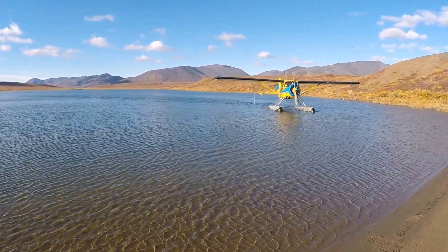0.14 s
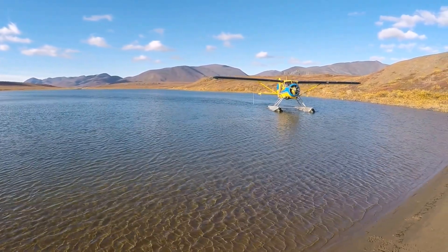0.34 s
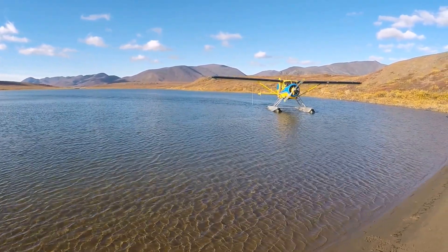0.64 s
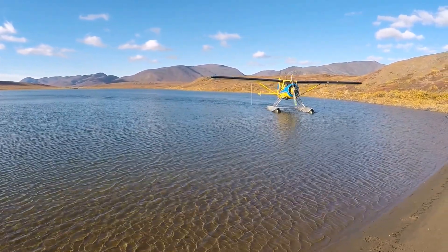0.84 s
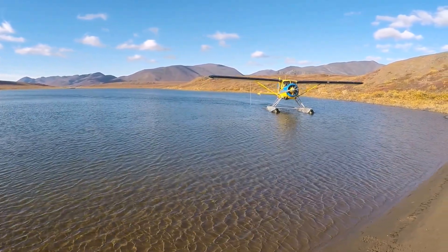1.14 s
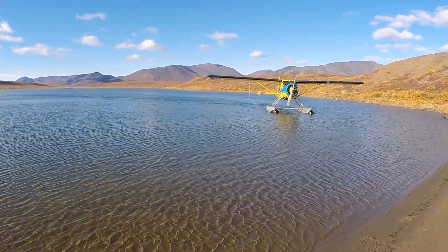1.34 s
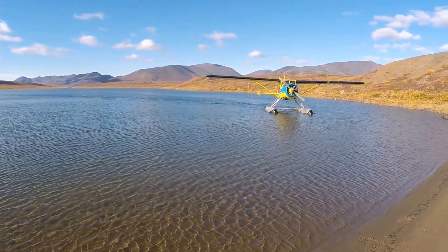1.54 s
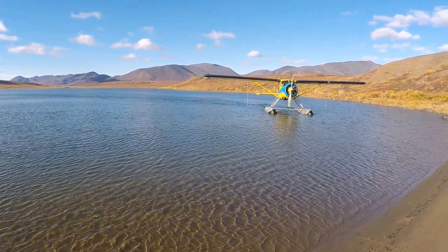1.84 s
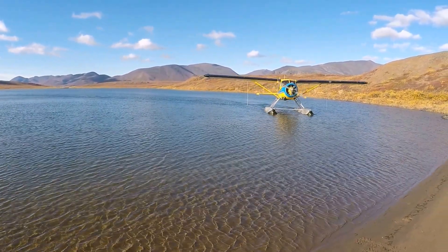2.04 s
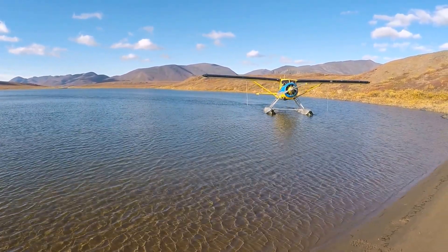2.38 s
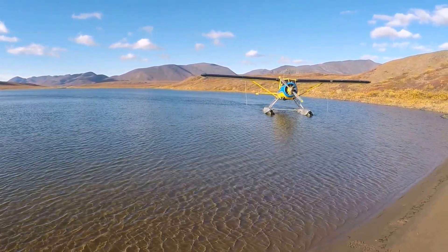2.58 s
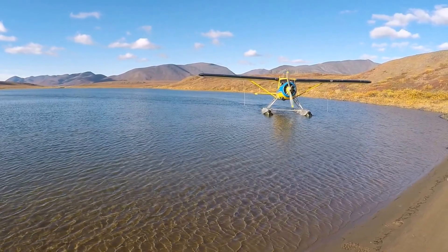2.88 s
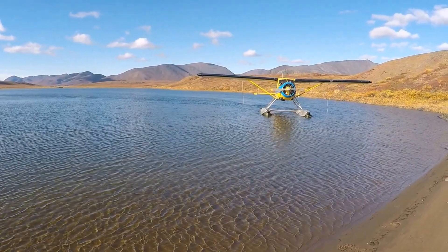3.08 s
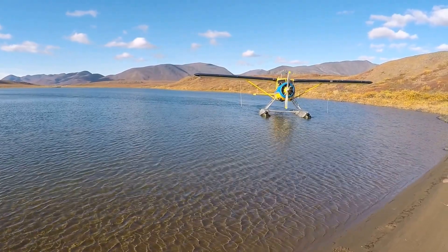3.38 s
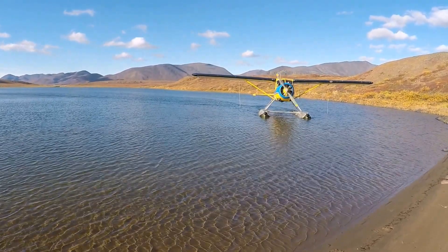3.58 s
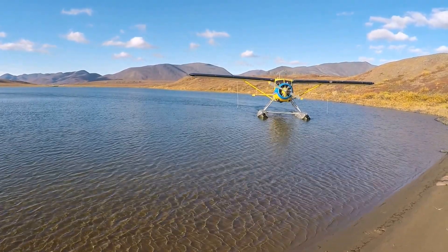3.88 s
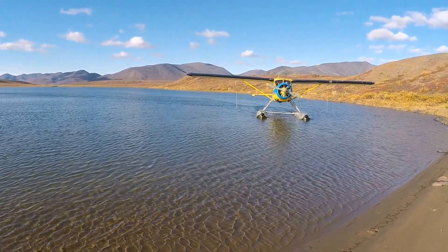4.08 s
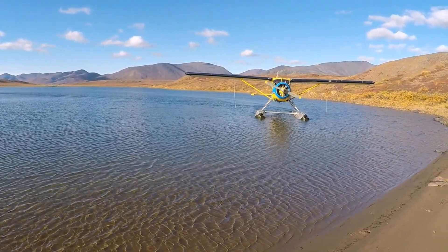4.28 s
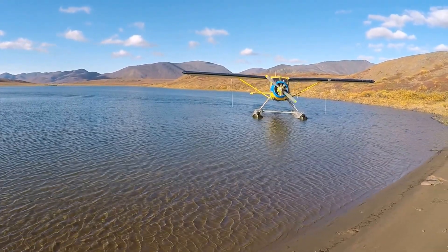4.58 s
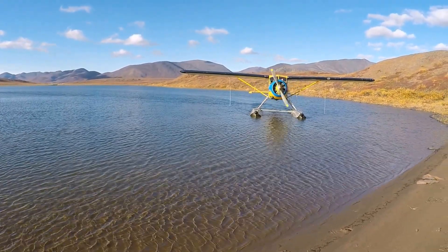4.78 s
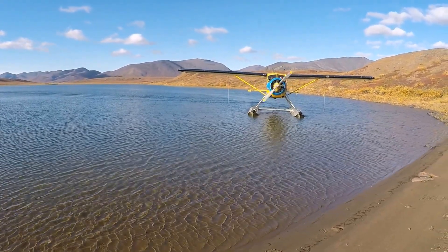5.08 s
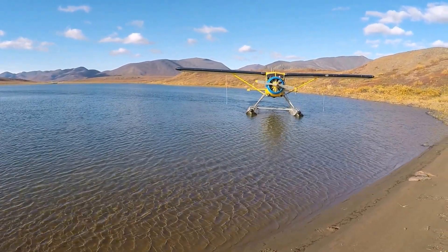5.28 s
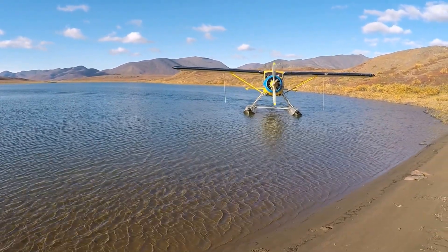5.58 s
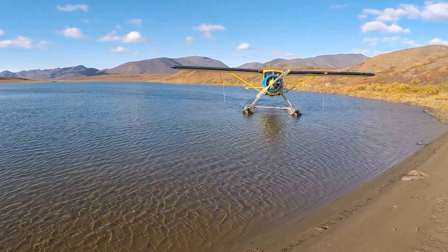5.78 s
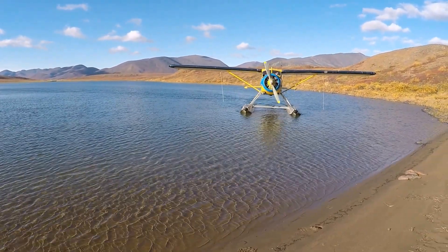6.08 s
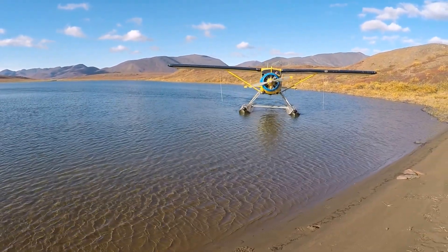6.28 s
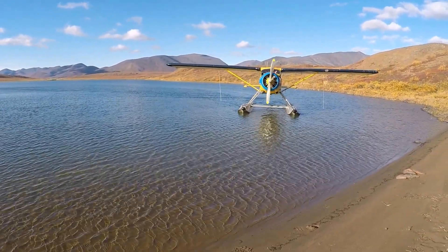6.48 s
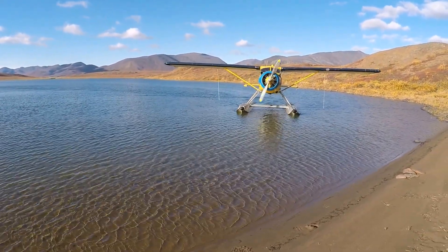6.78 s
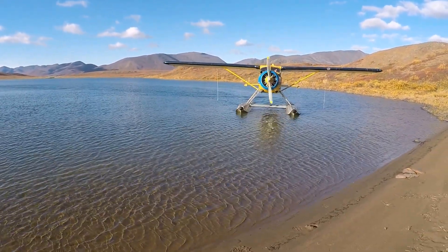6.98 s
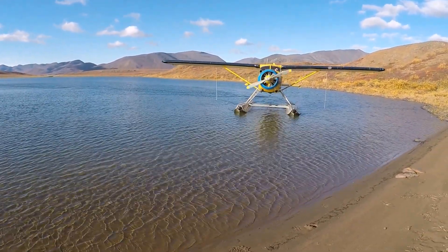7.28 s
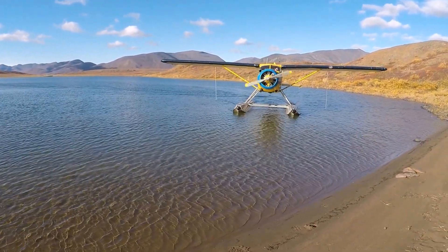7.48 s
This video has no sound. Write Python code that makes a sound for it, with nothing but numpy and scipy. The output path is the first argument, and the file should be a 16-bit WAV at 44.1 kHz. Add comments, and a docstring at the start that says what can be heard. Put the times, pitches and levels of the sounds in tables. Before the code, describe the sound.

An exposed microphone on a lake beach picks up strong wind and a radial-engined floatplane idling on the water. Throughout, the wind is louder and deeper than the engine: a wavering hum near 58 Hz, lumpy rumble and short gliding thumps with ragged flaps. From 0 to 2.9 s the engine sputters in fast, uneven exhaust puffs, hissing and whistling around 2 kHz over a mid-pitched drone, propeller rush and fine valve crackle. Between 2.9 and 3.6 s the whistle fades to a dull breath and lone clicks stand out. From 4 to 5 s the puffs are softer, barkier and shorter, with the roar sinking. Wind slaps bunch densely at 4.2 to 4.5 s and hit hardest around 5.3 to 5.8 s. After 6.3 s the wind mostly eases, leaving distinct dry chugs and faint clicks, with a few small thumps near 7.4 s; the engine is still idling at the end.

```python
"""A radial-engined floatplane idles unevenly on a lake, turning its nose toward a microphone on the beach.
At first exhaust puffs hiss and whistle in the pipes over a roar of drone, rush and hum.
From 2.9 to 3.6 s the nose hides the pipe mouths: the whistle blurs to a breath, then lone clicks stand out.
Late on the roar sinks and the puffs grow shorter. Filtered noise and wavering sines make these sounds.
Throughout, wind gives a wavering low hum near 58 Hz and slaps the microphone in short gliding swings."""
import sys
import numpy as np
from scipy import signal
from scipy.fft import rfft, irfft, next_fast_len
from scipy.io import wavfile
from scipy.ndimage import uniform_filter1d

SR = 44100
rng = np.random.default_rng(int(sys.argv[2]) if len(sys.argv) > 2 else 0)


def waveform_to_disk(signal):
    """Save audio, clipped to [-1, 1], as 16-bit WAV at the path in sys.argv[1]."""
    frames = np.transpose(np.atleast_2d(signal))
    scaled = np.clip(frames, -1, 1) * 32767
    samples = np.round(scaled).astype(np.int16)
    wavfile.write(sys.argv[1], SR, samples)


def gain_from_db(level_db):
    """Turn a decibel level (scalar or array-like) into a linear amplitude factor."""
    decades = np.asarray(level_db, float) / 20
    return 10 ** decades


N = 336924
T = np.arange(N) / SR  # seconds
F = np.maximum(np.fft.rfftfreq(next_fast_len(N, real=True), 1 / SR), 1)  # Hz
LONG = 2 * (len(F) - 1)  # noise is made a little longer, at a quick transform size

# Roar between the puffs. Each row: time in seconds, then nominal levels of drone, rush and hum in dB.
ROAR_LEVELS = [(0.0, -44.5, -44.5, -45.5), (1.38, -42, -44.5, -46), (1.81, -42, -42, -39.5),
               (2.06, -40.5, -44.5, -46.5), (2.47, -39.5, -41, -41.5), (2.79, -40, -43, -43.5),
               (5.02, -45, -47, -50), (5.6, -45, -45.5, -50), (6.43, -45.5, -50, -48),
               (7.25, -53.5, -54, -48), (7.64, -50, -54.5, -50.5)]
# Wind on the microphone. Each row: time in seconds, then nominal levels of heave and rumble in dB.
WIND_LEVELS = [(0.0, -15, -31.5), (0.08, -21, -28), (0.15, -15.5, -28), (0.59, -20, -40), (0.68, -15, -31),
               (0.94, -21, -29), (1.0, -8.5, -28.5), (1.06, -22, -30), (1.51, -19, -39), (1.55, -30, -32),
               (1.64, -19, -28.5), (1.91, -19, -32), (2.06, -20, -29), (2.62, -18.5, -32.5),
               (2.68, -20, -31), (4.02, -22, -37.5), (4.17, -20.5, -28.5), (4.34, -16.5, -26.5),
               (4.72, -22, -36.5), (5.64, -18, -29), (7.02, -28.5, -49), (7.32, -29, -47),
               (7.4, -18.5, -45), (7.64, -24.5, -42)]
# Spectrum of the propeller rush, also of valve ticks. Each row: frequency in Hz, relative gain in dB.
RUSH_COLOUR = [(1500, 2.5), (2100, 1), (2400, -0.5), (3100, -1.5), (3650, -6.5), (5000, -9.5),
               (7000, -18.5), (8500, -26.5), (13000, -34.5), (15300, -40)]


def unit(x):
    """Normalisation to unit rms, the root of the mean power."""
    return x / np.sqrt(np.mean(x ** 2))


def response(colour):
    """Spectral envelope: gain per frequency, interpolated in dB over log frequency."""
    hz, db = np.transpose(colour)
    return gain_from_db(np.interp(np.log(F), np.log(hz), db, left=-99, right=-99))


def shaped(gain):
    """Linear filtering: white noise takes on the gain at each frequency."""
    spectrum = rfft(rng.standard_normal(LONG))
    return unit(irfft(spectrum * gain, LONG))


def noise(colour, even=0.):
    """Narrow bands of noise swell by chance; dividing by the envelope evens them as even nears 1."""
    gain = response(colour)
    x = shaped(gain)
    if even:
        x = x / (np.abs(signal.hilbert(x)) + 0.15) ** min(even, 1)
        skirts = np.minimum(4 * gain / gain.max(), 1)  # keeps the skirts dark
        x = unit(irfft(rfft(x) * skirts, LONG))
    return x[:N]


def walk(rate):
    """Slow random modulation: levels held 1 / rate s and slewed twice; spread near 1."""
    hold = int(SR / rate)
    levels = np.repeat(rng.standard_normal(N // hold + 1), hold)
    return unit(uniform_filter1d(uniform_filter1d(levels, hold), hold)[:N])


def tone(hz):
    """Frequency modulation: phase is the running integral of the pitch."""
    return np.sin(2 * np.pi * np.cumsum(hz) / SR)


def patchy(colour, swing_db, rate, count=6):
    """Independent modulation of adjoining bands: the colour of the noise keeps shifting."""
    edges = np.geomspace(colour[0][0], colour[-1][0], count + 1)
    spectrum = rfft(shaped(response(colour)))
    total = 0
    for low, high in zip(edges, edges[1:]):
        band = irfft(spectrum * ((F >= low) & (F < high)), LONG)[:N]
        total = total + band * gain_from_db(swing_db * walk(rate))
    return unit(total)


def curves(table):
    """Piecewise-linear control: the columns of a table at every sample."""
    s, *columns = np.transpose(table)
    return [np.interp(T, s, c) for c in columns]


def bursts(times, db, rise, fall, late, knee=0.92):
    """Incoherent sum: event powers add; bell rise, peak late s after its time, fall more abrupt with knee."""
    power = np.zeros(N)
    for s, size, up, down in np.broadcast(times, gain_from_db(db), rise, fall):
        near = slice(max(int((s + late - 3 * up) * SR), 0), int((s + late + 6 * down) * SR))
        t = T[near] - s - late
        shape = np.where(t < 0, np.exp(-(t / up) ** 2), np.exp(-np.abs(t / down) ** knee))
        power[near] += (size * shape) ** 2
    return np.sqrt(power)


def eddies(times, db, hz, glide, rise, fall):
    """Passing vortices: each gives one short pressure swing whose pitch drops as the eddy passes."""
    out = np.zeros(N)
    for s, size, pitch, start in zip(times, gain_from_db(db), hz, rng.random(len(times))):
        near = slice(max(int((s - .04) * SR), 0), int((s + .06) * SR))
        t = T[near] - s
        cycles = pitch * (1 - np.exp(-glide * t)) / glide  # integral of a decaying pitch
        swing = np.cos(2 * np.pi * (cycles + 0.44 * (start - .5)))
        out[near] += size * np.exp(-(t / np.where(t < 0, rise, fall)) ** 2) * swing
    return out


def between(times, listed, clear_s):
    """Event spacing: which times lie clear of every listed event."""
    return np.abs(times[:, None] - listed).min(axis=1) > clear_s


def air():
    """Stationary broadband noise: a faint steady airy hiss."""
    # Each row: frequency in Hz, relative gain in dB.
    air_colour = [(3000, -23.5), (5000, -14), (9000, 0), (15300, -6)]
    return gain_from_db(-74.5) * noise(air_colour)


def buffets():
    """Turbulent intermittency: strong buffets, and small ones at chance moments that follow the rumble."""
    # Each row: nominal time in seconds, slap level in dB, rattle in dB against the slap, slap pitch in Hz.
    strong_buffets = [(0.058, -22, -5, 161), (0.135, -22.5, -14, 139), (0.193, -14.5, -13, 113),
                      (0.312, -19, -6, 153), (0.427, -27.5, 3, 182), (0.841, -15.5, -15, 126),
                      (1.056, -27, -6, 142), (1.32, -16.5, -19.5, 130), (1.431, -15, -13.5, 129),
                      (1.471, -14, 2, 175), (1.638, -17, -15.5, 150.2), (1.701, -21.5, -11, 205),
                      (1.794, -24.5, -10, 152.8), (1.931, -27.5, -8.5, 153), (1.968, -18.5, -7, 132),
                      (2.093, -39, -10, 144.8), (2.239, -21, -12, 130.0), (2.345, -15.5, -11, 163),
                      (2.539, -28, -27, 140.8), (2.587, -20, -1, 145), (2.619, -17.5, -11, 146),
                      (2.666, -19.5, -11, 117), (2.855, -24.5, -11, 124.7), (3.003, -29, -9, 198),
                      (3.039, -23, -15, 122.0), (3.726, -17.5, -21, 158), (3.749, -19.5, -20, 135.4),
                      (3.834, -19, -19, 146.0), (4.17, -19.5, -14, 124), (4.272, -14.5, -26, 127.0),
                      (4.314, -20.5, -16, 135.8), (4.352, -20, -9, 133), (4.394, -21.5, -11, 119),
                      (4.42, -18, -1.5, 196), (4.517, -18.5, -26, 122.2), (4.714, -20.5, -14, 155.3),
                      (4.944, -16, -23, 128), (4.976, -15, -16, 138), (5.041, -21, -26, 101),
                      (5.082, -22.5, -33, 146), (5.193, -19, -27, 130.1), (5.236, -20, -16, 120.9),
                      (5.331, -10, -8.5, 146), (5.491, -14, -20, 115.9), (5.53, -12, -2.5, 130.9),
                      (5.596, -18.5, -7, 198), (5.633, -17.5, -9, 142), (5.738, -18.5, -14, 145.3),
                      (5.796, -27.5, -16, 142.5), (5.828, -13.5, -4.5, 201.5), (5.983, -14.5, -27, 148.9),
                      (6.021, -12.5, -12, 138.1), (6.136, -17.5, -18, 132), (6.234, -27, -17, 107),
                      (6.289, -27, -17, 110.1), (6.429, -31, -14, 142), (6.691, -26, -32, 121.3),
                      (7.404, -25, -21, 111.4), (7.479, -19.5, -37, 130), (7.595, -26.5, -31, 138.5)]
    small_per_s, small_hz = 9, 122  # before those near a strong buffet are left out; typical pitch
    small_db, small_scatter_db, small_rattle_db = 2, 3.5, -14  # slap over the rumble; rattle at most
    strong = np.array(strong_buffets)
    count = int(small_per_s * N / SR)
    chance = rng.standard_normal((count, 3))
    s = (np.arange(count) + rng.random(count)) / small_per_s
    slap_db = np.interp(s, T, curves(WIND_LEVELS)[1]) + small_db + small_scatter_db * chance[:, 0]
    rattle_db = small_rattle_db - 4.7 * np.abs(chance[:, 1])
    small = np.column_stack([s, slap_db, rattle_db, small_hz * (1 + 0.17 * chance[:, 2])])
    return np.vstack([strong, small[between(s, strong[:, 0], .03)]]).T


def low_hum(s, slap_db):
    """Frequency and amplitude modulation: a low hum near 58 Hz wavers and swells with each buffet."""
    # Each row: time in seconds, pitch in Hz about which the hum wavers, nominal level in dB.
    hum_waver = [(0.0, 65.7, -15.5), (0.08, 64.8, -24), (0.17, 58.87, -12), (0.49, 58.05, -28),
                 (0.64, 62.5, -30), (0.72, 55.95, -24.5), (1.3, 62, -15.5), (1.4, 48.7, -19),
                 (1.47, 47.8, -15.5), (1.6, 62.3, -20), (1.81, 55.16, -10), (2.0, 56.14, -21),
                 (2.57, 60.08, -14.5), (3.15, 57.1, -17.5), (3.25, 60.48, -16), (3.43, 51.9, -21),
                 (3.62, 51.93, -22), (3.72, 59.8, -20), (3.96, 61.5, -23), (4.17, 55.56, -15.5),
                 (4.45, 53.7, -33), (4.51, 49.06, -26), (4.66, 50.22, -20), (4.79, 62.7, -19.5),
                 (4.94, 55.62, -20.5), (5.36, 56.65, -26), (5.45, 52, -13), (5.64, 61.26, -24),
                 (6.04, 53.3, -23.5), (6.13, 48.52, -20.5), (6.51, 51.5, -26.5), (6.59, 60.5, -34),
                 (7.23, 50.68, -34.5), (7.38, 63.77, -36), (7.55, 53.2, -35), (7.64, 54.4, -36)]
    hum_hz, hum_db = curves(hum_waver)
    sine = tone(hum_hz * (1 + 0.025 * walk(24.97)))
    swell = bursts(s, slap_db, 0.012, 0.0092, 0.0034, knee=2.3)
    return (gain_from_db(hum_db + 0.5 + 3.1 * walk(22)) + swell) * sine


def gusts():
    """Turbulent pressure: slow heave, lumpy rumble, flutter, and the port's cavity resonance."""
    # Four spectra. Each row: frequency in Hz, relative gain in dB.
    heave_colour = [(12, -5), (25, -2.5), (45, -2.5), (80, -8.5), (120, -46)]
    rumble_colour = [(60, 6), (90, 1), (140, -3.5), (200, -8), (280, -20.5), (500, -63)]
    boom_colour = [(90, -31), (120, -4), (140, 0), (165, -4.5), (220, -21)]
    flap_colour = [(170, -6.5), (230, 0.5), (330, -5), (450, -8.5), (600, -21)]
    # Cavity boom rung by the wind. Each row: time in seconds, level in dB against the nominal rumble.
    boom_levels = [(0, -2), (.6, -2), (2.9, -2), (3.5, -9.5), (7.64, -18)]
    # Fluttering wind between the buffets. Each row: time in seconds, nominal level in dB.
    flutter_levels = [(0.0, -40), (0.23, -45), (0.45, -47), (0.7, -48.5), (0.94, -42), (1.4, -47),
                      (1.81, -37.5), (1.98, -36), (2.21, -45), (2.49, -38), (3.17, -44.5), (3.81, -40),
                      (4.09, -49), (4.36, -48), (4.72, -46), (5.02, -54), (5.13, -55), (5.55, -36.5),
                      (5.68, -35), (5.79, -42), (6.08, -51), (6.3, -57), (6.89, -54), (7.64, -55)]
    heave_db, rumble_db = curves(WIND_LEVELS)
    heave = gain_from_db(heave_db - 2.0 + 1.9 * walk(8.2)) * noise(heave_colour)
    rumble = gain_from_db(rumble_db + 2.5 + 4.8 * walk(35)) * noise(rumble_colour, even=0.99)
    boom = gain_from_db(rumble_db + curves(boom_levels)[0] + 2.7 * walk(12)) * noise(boom_colour)
    flutter = gain_from_db(curves(flutter_levels)[0] - 1.9 + 4.16 * walk(45)) * noise(flap_colour)
    return heave + rumble + boom + flutter


def slaps(s, slap_db, rattle_db, slap_hz):
    """Eddy impact: a gliding thump with ragged noise; small eddies come first, so it starts bright."""
    # Two spectra. Each row: frequency in Hz, relative gain in dB.
    slap_colour = [(60, 0), (120, 1), (220, -1.5), (350, -11.5), (480, -24)]
    rattle_colour = [(250, -1.5), (420, -1), (700, -15.5), (1000, -19), (1500, -40)]
    torn = gain_from_db(2.5 * walk(120))  # a buffet comes in ragged flaps
    thumps = gain_from_db(3.5) * eddies(s, slap_db, slap_hz, glide=43.0, rise=0.0065, fall=0.019)
    body = gain_from_db(-5.0) * bursts(s, slap_db, 0.0092, 0.017, 0.00063, knee=0.96)
    body = body * noise(slap_colour, even=0.91) * torn
    rattle = gain_from_db(-4.5) * bursts(s, slap_db + rattle_db, 0.0059, 0.014, -0.0047, knee=1.4)
    rattle = rattle * noise(rattle_colour, even=0.36) * torn
    return thumps + body + rattle


def snaps():
    """Small-scale turbulence: sharp flaps, each a noise burst with a gliding pressure swing."""
    # Each row: nominal time in seconds, nominal level in dB, pitch in Hz at the centre of the swing.
    sharp_flaps = [(0.053, -27, 283), (0.138, -28, 231), (0.188, -20.5, 290), (0.236, -29, 744),
                   (0.3, -16, 231), (0.308, -19, 614), (0.316, -28, 520), (0.42, -18.5, 315),
                   (0.719, -27, 533), (0.73, -28.5, 520), (0.823, -20.5, 283), (0.882, -26, 520),
                   (0.896, -26, 480), (0.986, -23, 237), (1.045, -30, 520), (1.12, -29, 547),
                   (1.315, -24, 258), (1.413, -27, 563.4), (1.424, -29, 580), (1.46, -19, 300),
                   (1.468, -12, 260), (1.477, -17, 420), (1.631, -23, 231), (1.698, -17.5, 258),
                   (1.788, -19, 253), (1.894, -29, 264), (1.923, -14, 258), (1.965, -19.5, 240),
                   (1.996, -20, 300), (2.21, -30, 250), (2.337, -27, 231.2), (2.585, -16.5, 420),
                   (2.709, -16, 230), (2.785, -26, 230.8), (2.998, -16.5, 231.4), (3.106, -35, 243),
                   (3.7, -18.5, 262.7), (3.72, -21, 330), (3.741, -20, 280), (3.77, -23, 300),
                   (3.797, -26, 420), (3.82, -27, 560), (4.022, -26.5, 280), (4.165, -20, 231),
                   (4.191, -22, 300), (4.265, -26, 232), (4.311, -28, 252.2), (4.345, -24, 231),
                   (4.388, -21, 330), (4.412, -15.5, 232), (4.453, -22, 260), (4.522, -28, 231),
                   (4.642, -31, 405.5), (4.709, -24, 256.3), (4.939, -27, 228.4), (4.969, -18.5, 231.2),
                   (5.075, -32, 231), (5.18, -24.5, 249.9), (5.307, -22, 299.9), (5.319, -14.5, 266.2),
                   (5.33, -13, 300), (5.348, -28, 328.4), (5.37, -21, 260), (5.494, -22, 283),
                   (5.521, -12, 700), (5.526, -12.5, 400), (5.545, -22, 379.3), (5.561, -31, 330),
                   (5.597, -19, 261), (5.61, -19.5, 350), (5.634, -17.5, 234), (5.702, -27, 280),
                   (5.732, -25, 261.1), (5.809, -21, 540.6), (5.814, -12, 279), (5.838, -20, 560),
                   (5.983, -26, 231), (6.014, -19, 229.7), (6.127, -24.5, 315), (6.421, -28, 231.6),
                   (7.392, -27, 240.1), (7.477, -32, 231.4)]
    # Each row: frequency in Hz, relative gain in dB.
    snap_colour = [(200, -1), (400, 4.5), (700, -5), (1000, -13), (1500, -38)]
    at, snap_db, snap_hz = np.transpose(sharp_flaps)
    hiss = gain_from_db(-10.0) * bursts(at, snap_db, 0.0017, 0.0045, 0.0032) * noise(snap_colour, even=0.59)
    return hiss + gain_from_db(-3.0) * eddies(at + 0.00258, snap_db, snap_hz, glide=48.0, rise=0.0024, fall=0.005)


def wind():
    """Flow noise at a microphone: low hum, turbulent gusts and buffets superpose."""
    s, slap_db, rattle_db, slap_hz = buffets()
    return low_hum(s, slap_db) + gusts() + slaps(s, slap_db, rattle_db, slap_hz) + snaps()


def valve_gear(rush_db):
    """Impact noise: a dense crackle of ticks that follows the rush, and lone sharp clicks."""
    # Lone clicks. Each row: nominal time in seconds, nominal level in dB.
    lone_clicks = [(3.3364, -36), (3.527, -32), (3.6004, -38), (3.7833, -39), (3.8909, -40), (3.9827, -40),
                   (5.9544, -42.5), (6.1892, -44), (6.3719, -38), (6.4278, -43), (6.6872, -33.5),
                   (6.7745, -47), (7.0294, -48), (7.1544, -43), (7.5373, -46)]
    # Each row: frequency in Hz, relative gain in dB.
    click_colour = [(1800, -8), (3000, -1), (4500, 0), (7000, -8.5), (9000, -18)]
    crackle_per_s, crackle_db, crackle_scatter_db = 140, -4, 2.5  # levels against the nominal rush
    count = int(crackle_per_s * N / SR)
    at = (np.arange(count) + rng.random(count)) / crackle_per_s
    tick_db = np.interp(at, T, rush_db) + crackle_db + crackle_scatter_db * rng.standard_normal(count)
    crackle = bursts(at, tick_db, 0.0006, 0.0021, 0) * noise(RUSH_COLOUR)
    at, click_db = np.transpose(lone_clicks)
    return crackle + gain_from_db(-3.0) * bursts(at, click_db, 0.00063, 0.0016, 0.0012) * noise(click_colour)


def roar():
    """Amplitude-modulated noise: cowling drone and propeller rush share a flutter, over hum and valve gear."""
    # Two spectra. Each row: frequency in Hz, relative gain in dB.
    drone_colour = [(750, -27), (880, -7.5), (1100, 6), (1400, -3.5), (1800, -17), (2200, -17)]
    hum_colour = [(330, -18), (450, -9.5), (600, -3), (760, -8), (900, -14)]
    drone_db, rush_db, hum_db = curves(ROAR_LEVELS)
    flutter_db = 1.3 * walk(55)
    drone = gain_from_db(drone_db + flutter_db + 1.23 * walk(60)) * noise(drone_colour)
    hum = gain_from_db(hum_db - 4.0 + 2.7 * walk(30)) * noise(hum_colour)
    rush = gain_from_db(rush_db + flutter_db - 0.97) * patchy(RUSH_COLOUR, 3.25, 60)
    return valve_gear(rush_db) + drone + hum + rush


def firings():
    """Quasi-periodic excitation: listed puffs, and weak ones on a jittered beat wherever it is clear of them."""
    # Puffs, down to a faint dull breath near the end. Each row: nominal time in seconds,
    # nominal hiss level in dB, then sizzle, pipe whistle and bark, each in dB against the nominal hiss.
    listed_puffs = [(0.045, -34.5, -12.5, -26, -7), (0.123, -31, -16, -9.5, -3),
                    (0.193, -32, -14, -0.5, -20), (0.234, -31, -12, -5, -3), (0.421, -33.5, -13, -12, 1.5),
                    (0.511, -44, -26, -16, 1), (0.582, -38, -21, -6, -6), (0.648, -38, -10.5, 3, -1),
                    (0.726, -39.5, -11, -21, -12), (0.779, -41.5, -25, -4.0, 13),
                    (0.845, -31.5, -14, 1.5, -13), (0.888, -33, -10.5, -8, -19), (0.936, -39, -22, -11, 4),
                    (0.969, -32.5, -16, -4, -7.5), (1.002, -34.5, -12, -1, 3), (1.042, -32, -13.5, -4, -7),
                    (1.118, -32.5, -12, 4, -3), (1.207, -45, -25, -6, -6), (1.269, -31, -13.5, -6, -5),
                    (1.418, -36.5, -11, -14, -13), (1.466, -38.5, -22, -9, 8), (1.57, -35, -10, 2.5, -15),
                    (1.617, -40.5, -26, -2, 11), (1.649, -35.5, -16, -5, -1.0),
                    (1.683, -31.5, -13, -11, -4), (1.721, -36.5, -9.5, 6, -5), (1.797, -31, -14, -5, -3),
                    (1.83, -34, -17, -13, -6), (1.862, -36, -11, 0, 2.5), (1.94, -31.5, -14.5, -2.5, -12),
                    (2.084, -34.5, -12.5, -4, -8), (2.228, -36.5, -9.5, 2, -14), (2.276, -44.5, -22, 8, 14),
                    (2.305, -35, -19, -17, 2.5), (2.339, -31.5, -10, -25, -3), (2.375, -36.5, -8, -1, -6),
                    (2.444, -32.5, -13.5, -5.5, -3), (2.475, -38.5, -11, -8, 4), (2.507, -39.5, -9, 6, 3),
                    (2.577, -34.5, -13, -7, -2), (2.707, -38, -10.5, 0.5, -4),
                    (2.845, -32.5, -13, -1.5, -15), (2.889, -34.5, -21, -8, 3),
                    (3.056, -42, -11.5, -12, -8), (3.212, -37, -21, -1, -1), (3.333, -58, -9, -9, 2),
                    (3.394, -46, -14, -10, 12), (3.554, -34.5, -19, -4, 3), (3.623, -39.5, -15, -15, 1),
                    (3.745, -48.5, -9, 3, 14.5), (3.822, -41.5, -10, -4, 2), (3.919, -38.5, -24, 1.5, -10),
                    (4.035, -39.5, -11, -21, -4), (4.132, -42.5, -15, -9, 8), (4.224, -41.5, -17, 0, 4),
                    (4.311, -35, -20.5, -4.5, -0.5), (4.352, -44.5, -19, -4, 1), (4.397, -46, -15, -9, 2),
                    (4.475, -40.5, -9, -14, 2), (4.531, -40, -20, -5, 6.5), (4.585, -45, -24, 0, 5),
                    (4.638, -43.5, -23, 0, 3), (4.66, -34, -13, -9, -12), (4.718, -34.5, -19, -4, 0),
                    (4.766, -42.5, -18, -15, 6), (4.812, -50, -19, -12, 7), (4.912, -52, -25, 1.5, 9),
                    (4.955, -39.5, -22, -1, 5), (5.008, -42.5, -14, -6, 5), (5.06, -42.5, -18, 1, -4),
                    (5.16, -47, -22.0, 4.5, 7), (5.211, -47, -23, 1, -2), (5.302, -40, -7, -11, 3),
                    (5.41, -38, -9.5, -1, 6), (5.471, -41.5, -24, 0.5, 3), (5.507, -38.5, -11, -3, 0),
                    (5.63, -38.5, -25, -6, 6), (5.718, -36.5, -12, -16, -5), (5.839, -43.5, -24, 1, 4),
                    (5.88, -38, -24, 0.5, 6), (5.943, -46, -20.0, 0, 10), (5.997, -42, -24, 0.5, 2),
                    (6.072, -46.5, -23.0, 3, 0), (6.104, -42, -22, -7, 7), (6.153, -43, -23, -7, -9),
                    (6.194, -48.5, -14, -4, 9), (6.288, -50, -20, 9, 9), (6.338, -42.0, -20, 2.5, -4),
                    (6.39, -39.5, -22, 0, 5), (6.457, -40, -21, -1, 5), (6.527, -44.5, -16, 0.5, 9.5),
                    (6.647, -42, -18.5, -5, 11), (6.705, -41.5, -18, -3, 2), (6.793, -49, -18, -12, 15.5),
                    (6.861, -46, -19.0, -3, -3), (6.932, -46, -26, 3, -1.5), (6.973, -42, -17, -4, 4),
                    (6.997, -42.5, -27, 7, 12), (7.08, -41.5, -23, 1, 6), (7.17, -40.5, -21, -4, 5),
                    (7.196, -44.5, -17, -4, -6), (7.316, -41.5, -18, -2, 11), (7.398, -50.5, -22, 10.5, 12),
                    (7.5, -53, -19, -10, 18.5), (7.581, -41.5, -24, 0, 2)]
    firing_hz, jitter_s = 26, .008
    weak_db, weak_scatter_db = -6.5, 3.5  # weak hiss over the nominal rush
    voices_db, voice_scatter_db = (-23, -14, 8.5), 5  # sizzle, whistle and bark against the hiss
    listed = np.array(listed_puffs)
    beat = np.arange(0, N / SR, 1 / firing_hz)
    chance = rng.standard_normal((len(beat), 5))
    s = beat + jitter_s * chance[:, 0]
    hiss_db = np.interp(s, T, curves(ROAR_LEVELS)[1]) + weak_db + weak_scatter_db * chance[:, 1]
    weak = np.column_stack([s, hiss_db, voices_db + voice_scatter_db * chance[:, 2:]])
    return np.vstack([listed, weak[between(s, listed[:, 0], .028) & (s > 0)]]).T


def whistle():
    """Pipe resonance: each mode sings a rough wavering tone inside a band of noise."""
    # Each row: resonance in Hz, nominal width in Hz, relative level in dB.
    pipe_modes = [(2115, 140, 10), (3170, 280, -12)]
    # Breath left once the pipe mouths are hidden. Each row: frequency in Hz, relative gain in dB.
    breath_colour = [(1200, -12), (1500, -2), (1800, 0), (2500, 1), (3000, -0.5), (3800, -12)]
    gain, tones = 0, 0
    for hz, width, db in pipe_modes:
        gain = gain + gain_from_db(db) / (1 + (2 * (F - hz) / (1.3 * width)) ** 2)
        level = gain_from_db(db + 2.7 * walk(220))
        tones = tones + level * tone(hz + 0.6 * width * walk(18) + 0.7 * width * walk(130))
    # as the nose hides the pipe mouths the tones fade and a broad breath of that pitch takes over
    seen = np.interp(T, [2.9, 3.6], [1, .15])
    clear = unit(1.3 * shaped(gain)[:N] + unit(tones))
    return seen * clear + np.sqrt(np.clip(1 - seen ** 2, 0, 1)) * noise(breath_colour)


def exhaust():
    """Pulsed jet noise: a puff opens several voices of one gas jet, shorter and harder as the plane nears."""
    # Four spectra. Each row: frequency in Hz, relative gain in dB.
    hiss_colour = [(1400, -3.5), (2400, 2), (3000, 1.5), (3600, -0.5), (4400, -1), (6500, -8), (8500, -33)]
    sizzle_colour = [(6000, -4), (7500, -4.5), (10000, -15.5), (13000, -19), (15300, -24)]
    bark_colour = [(800, -12), (1000, 0.5), (1400, 0.5), (1700, -8.5), (2200, -24)]
    chug_colour = [(380, -33), (500, -8.5), (700, -11), (900, -17)]
    s, hiss_db, sizzle_db, whistle_db, bark_db = firings()
    short = np.interp(s, [0, 7.6], [1.05, .65])  # scales decay times
    hard = np.interp(s, [0, 5.5, 7.6], [1.1, .8, .45])  # scales rise times

    ragged = gain_from_db(1.87 * walk(400))  # turbulence tears the jet
    jet = gain_from_db(-2.0) * bursts(s, hiss_db, 0.0066 * hard, 0.024 * short, -0.0029, knee=1.07)
    out = jet * patchy(hiss_colour, 2.25, 70, count=5) * ragged

    pipes = gain_from_db(2.0) * bursts(s, hiss_db + whistle_db, 0.005 * hard, 0.011, 0.00088, knee=0.97)
    out += pipes * whistle()

    knock = tone(1235 + 150 * walk(20))  # cowling note under the bark, Hz
    bark = gain_from_db(-1.5) * bursts(s, hiss_db + bark_db, 0.0052 * hard, 0.02 * short, -0.00045)
    out += bark * unit(noise(bark_colour) + knock)

    chug_db = -8.5 + 3 * rng.standard_normal(len(s))  # against the nominal hiss
    chug = bursts(s, hiss_db + chug_db, 0.002, 0.014, 0.0047)
    out += chug * unit(noise(chug_colour) + 1.2 * tone(600 + 110 * walk(12)))

    ring = tone(4550 + 650 * walk(15) + 120 * walk(150))  # upper pipe note, Hz
    ring_db = -5.5 + 4.5 * rng.standard_normal(len(s)) + np.interp(s, [2.9, 3.6], [0, -5])
    out += bursts(s, hiss_db + ring_db, 0.0056, 0.007, 0.0005) * ring

    # the valve cracks open with a short tick, whose lead shrinks to nothing by the end
    tick_s = s - np.interp(s, [0, 5, 7.6], [.006, .003, -.0005])
    tick_db = hiss_db + np.interp(s, [0, 7.6], [-1.5, 2.5])
    out += bursts(tick_s, tick_db, 0.00054, 0.0026, 0) * noise(RUSH_COLOUR)

    sizzle = gain_from_db(2.0) * bursts(s, hiss_db + sizzle_db, 0.0086 * hard, 0.015 * short, -0.0016)
    return out + sizzle * noise(sizzle_colour) * gain_from_db(2.5 * walk(300))


def scene():
    """Superposition: engine, wind and airy hiss add at one microphone."""
    return (exhaust() + roar() + wind() + air())[None]


def top_cut(x):
    """Nothing passes above the cut-off."""
    return signal.sosfilt(signal.butter(12, 15350, fs=SR, output="sos"), x)


def record(dry):
    """Soft saturation: the loudest peaks are rounded off."""
    mix = 1.494 * np.tanh(dry / 1.722)
    return top_cut(mix)


dry = scene()
out = record(dry)
waveform_to_disk(out)
```